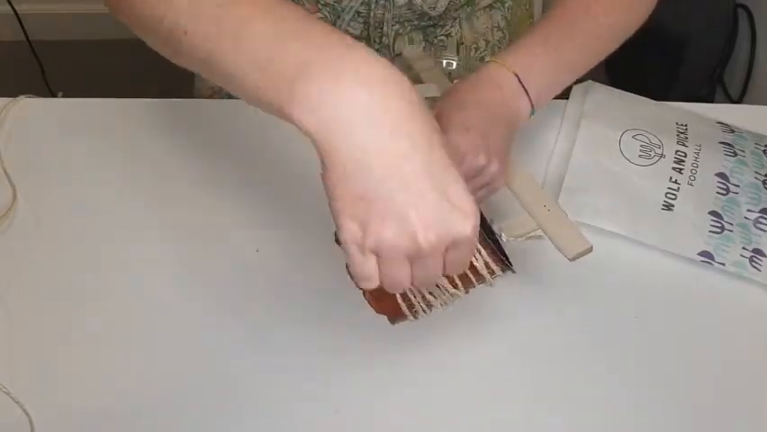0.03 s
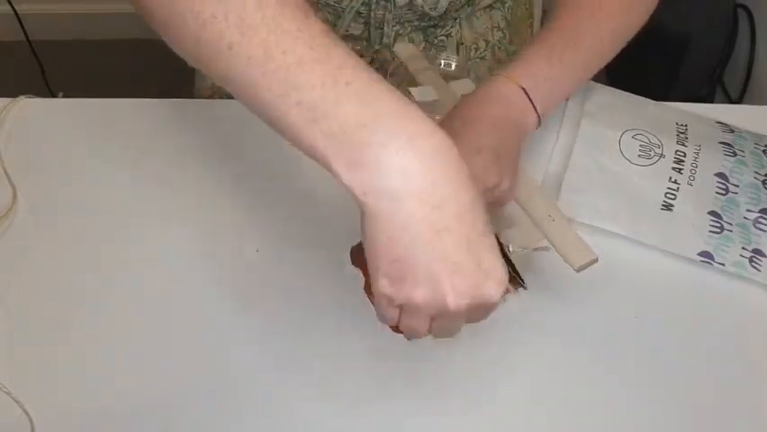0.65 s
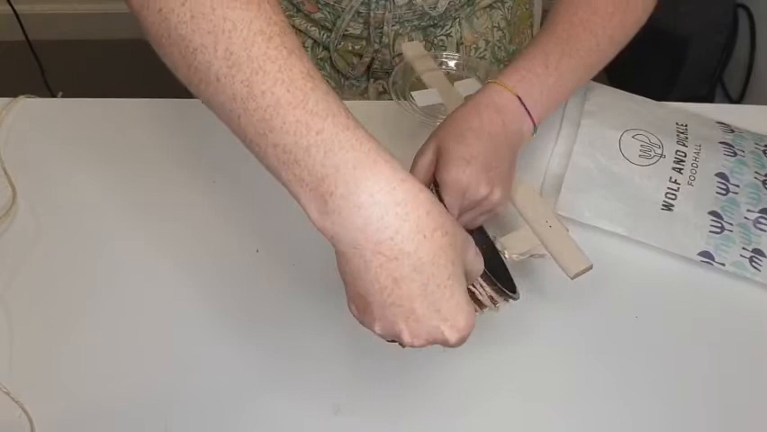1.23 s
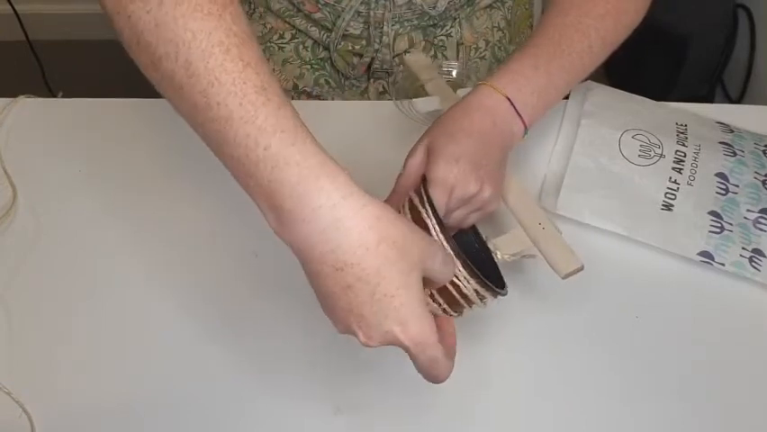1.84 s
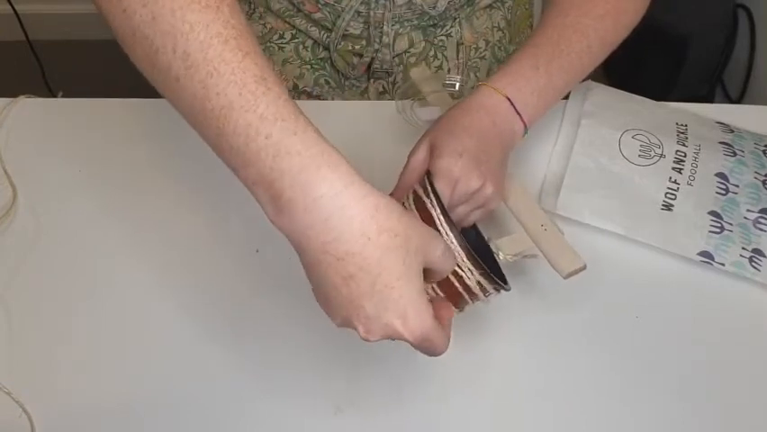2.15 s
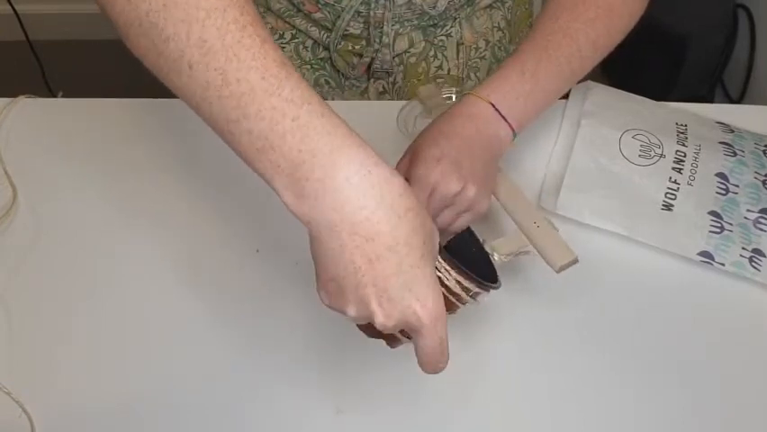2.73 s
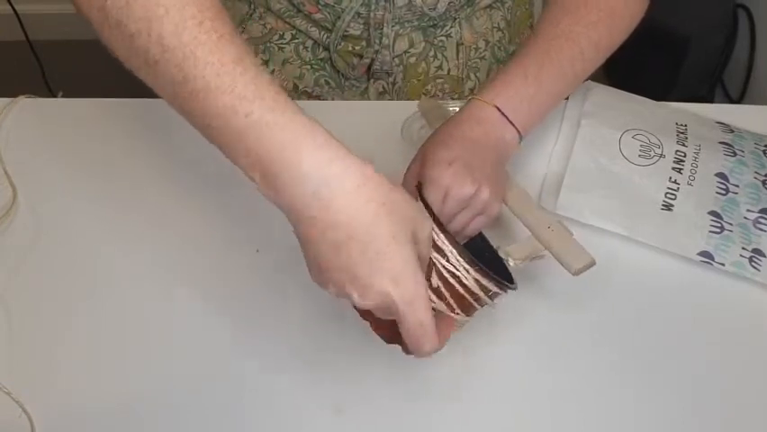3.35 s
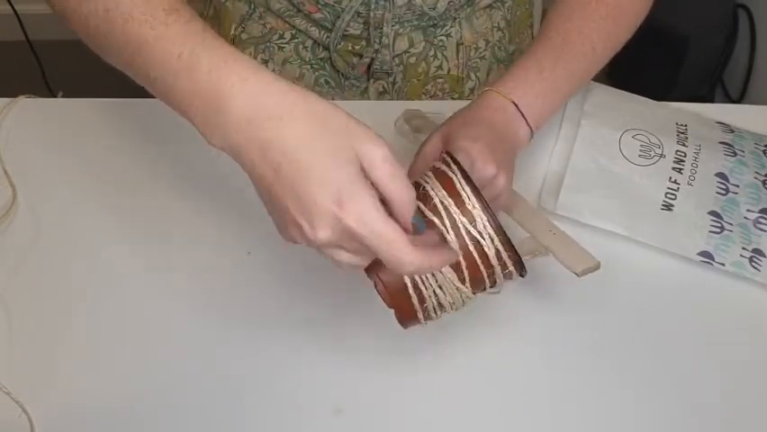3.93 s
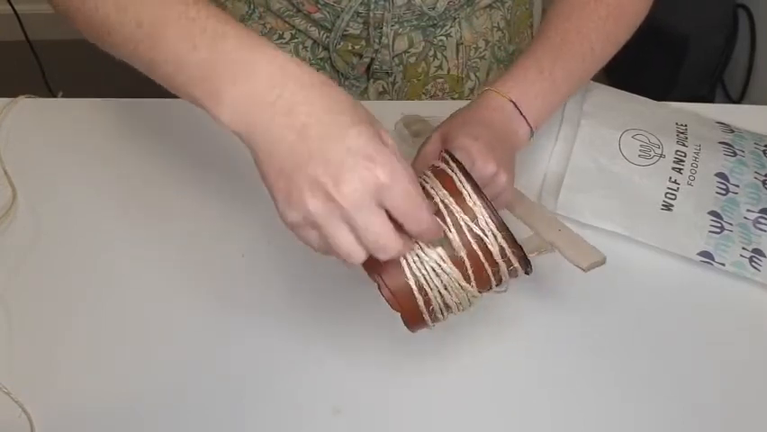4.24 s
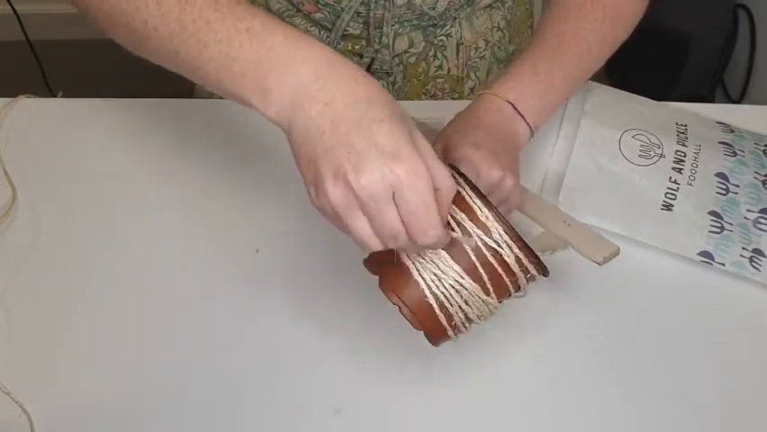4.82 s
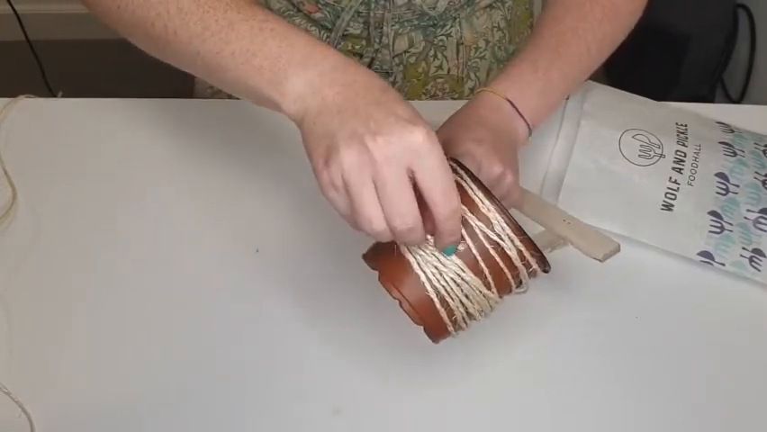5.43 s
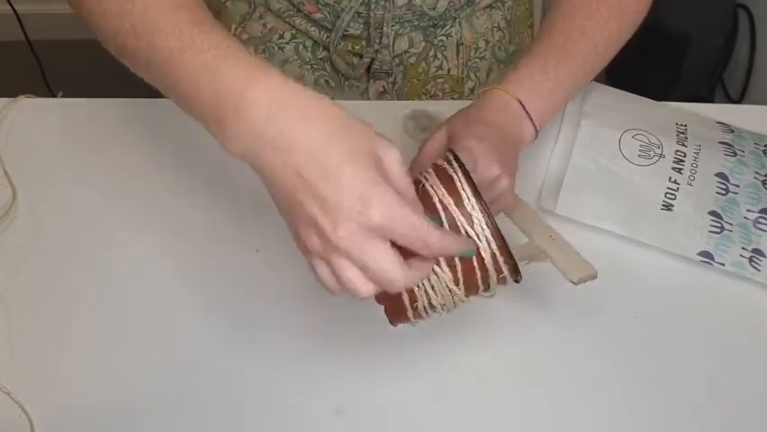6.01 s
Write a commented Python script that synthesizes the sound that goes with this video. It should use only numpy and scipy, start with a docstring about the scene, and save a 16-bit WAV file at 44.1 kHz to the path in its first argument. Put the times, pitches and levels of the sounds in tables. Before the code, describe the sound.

Fingers drag twine over a clay pot in uneven strokes, the fibres rustling and crackling while strands slip with small hollow snaps. The pot rocks on a table with light ringing taps, clacks down sharply once, then lands again with a duller thud. More rubbing, a cluster of clinks and a few fingernail rasps follow. It sounds close, in a small room with faint hiss and hum.

```python
"""Tucking twine around a clay pot

Fingers tuck twine around a clay flower pot that lies tilted on a table. Stroke by stroke the fibres
scrape and crackle, a nail rasps, and strands slip and snap against the wall. The pot rocks with small
ringing taps and twice knocks down harder. A small room echoes it all over a faint hiss and hum."""
import sys
import numpy as np
from scipy import signal
from scipy.fft import rfft, irfft, next_fast_len
from scipy.io import wavfile
from scipy.ndimage import map_coordinates

SR = 44100
rng = np.random.default_rng(int(sys.argv[2]) if len(sys.argv) > 2 else 0)


def wrap_up_sound(samples):
    """Save the sound to the file named by the first command line argument, as 16-bit audio."""
    columns = np.atleast_2d(samples).T
    # keep every value between -1 and 1, then stretch to whole-number steps
    tamed = np.clip(columns, -1, 1)
    steps = np.round(tamed * 32767).astype(np.int16)
    wavfile.write(sys.argv[1], SR, steps)


N = 272097

# The clay wall's tones (t60 is the time to fade by 60 dB): pitch_hz, t60_s, tapped_db, knocked_db
CLAY_TONES = [(492, .14, -12, -13), (1440, .08, -5, -15), (1545, .08, -5, -17), (2000, .12, -16, -11),
              (2300, .13, -7, -3), (2565, .085, -15, -4), (3105, .095, -9, -17), (3435, .06, -3, -12),
              (3551, .08, 6, -16), (4800, .1, -20, -13), (4880, .085, -6, -25), (6180, .08, -9, -20)]
# A colour says how strong each pitch is. The dull sound of twine on clay: pitch_hz, level_db
PLUCK_COLOUR = [(200, -32), (500, -31.5), (750, -19), (950, -2), (1170, 5.5), (1450, -6), (1900, -10.5),
                (3000, -24.5), (6000, -56)]
# The bright, dry sound of the fibres: pitch_hz, level_db
FIBRE_COLOUR = [(300, -27.5), (900, -10), (1400, -11.5), (2200, -3), (2850, 1.5), (3900, -2), (5400, -0.5),
                (7400, -2), (8700, -14.5), (11000, -14), (13000, -30)]
# The pot touching the table: pitch_hz, level_db
CONTACT_COLOUR = [(120, -20), (300, -17), (490, -9), (700, -6.5), (1000, 1), (1350, 1.5), (1900, -1.5),
                  (2600, -4.5), (4000, -4.5), (5800, -9), (7000, -16), (7900, -18), (9000, -26),
                  (13000, -43.5)]


def amp(db):
    """Turn decibels into a gain to multiply by."""
    return 10 ** (np.asarray(db) / 20)


def unit(x):
    """Scale a sound to an average (rms) level of 1."""
    return x / np.sqrt(np.mean(x ** 2) + 1e-20)


def along(points, hz):
    """Read between the rows of a (pitch_hz, value) table, on a log pitch scale."""
    pitches, values = np.transpose(points)
    return np.interp(np.log(hz + 1), np.log(pitches + 1), values)


def wobble(rate):
    """A curve that glides to a new random value `rate` times a second."""
    targets = rng.standard_normal(int(N * rate / SR) + 4)
    return map_coordinates(targets, [np.arange(N) * rate / SR], order=1)


def filtered(x, response):
    """Multiply each frequency in a sound by response(hz)."""
    n = x.shape[-1]
    padded = next_fast_len(n + min(n // 8, SR // 8), real=True)
    return irfft(rfft(x, padded) * response(np.fft.rfftfreq(padded, 1 / SR)), padded)[..., :n]


def coloured(x, colour, size=2048):
    """Give a sound a colour by turning each sample into a short click of that colour."""
    cepstrum = irfft(np.log(amp(along(colour, np.fft.rfftfreq(size, 1 / SR)))))
    cepstrum[1:size // 2] *= 2  # this folding packs the click's energy at its start
    cepstrum[size // 2 + 1:] = 0
    click = irfft(np.exp(rfft(cepstrum)))
    click /= np.linalg.norm(click)
    return signal.fftconvolve(x, click[None], axes=1)[:, :x.shape[1]]


def spread(pair):
    """Turn two unrelated noises into a left and right that are alike in the bass."""
    # How alike the two sides are: pitch_hz, likeness (0 to 1)
    alike = [(150, 0.98), (500, 0.4), (1000, 0.44), (2500, 0.6), (5000, 0.076), (10000, 0.062)]
    turn = lambda hz: np.arccos(np.clip(along(alike, hz), 0, 1)) / 2
    mid, side = filtered(pair, lambda hz: np.array([np.cos(turn(hz)), np.sin(turn(hz))]))
    return np.array([mid + side, mid - side])


def add(track, start_s, sound):
    """Mix a sound into a track at the given time."""
    part = track[:, max(round(start_s * SR), 0):][:, :sound.shape[-1]]
    part += sound[..., :part.shape[1]]


def blow(colour, contact_t60, scatter_db, scatter_t60):
    """A gritty hit, trailed by sound scattered off the hands, pot and table; it peaks near 1."""
    t = np.arange(SR // 7) / SR
    contact = rng.standard_normal(len(t)) * amp(-60 * t / contact_t60)
    contact /= np.linalg.norm(contact)
    scatter = spread(rng.standard_normal((2, len(t)))) * amp(-60 * t / scatter_t60)
    scatter /= np.linalg.norm(scatter[0])
    click = coloured(contact + amp(scatter_db) * scatter, colour)
    return click / (3 * np.std(click[:, :SR // 200]))


def ring(tones, vary_db, attack_s, beat_hz, twin_db):
    """Fading tones, at new strengths for each hit; each wavers against a weaker twin close in pitch."""
    t = np.arange(SR // 6) / SR
    hz, t60, db = np.transpose(tones)[:, :, None]
    level_db = db + vary_db * rng.standard_normal(hz.shape)
    phase = 2 * np.pi * (hz * t + rng.random(hz.shape))
    phase = phase + rng.standard_normal((2, len(hz), 1)) * hz / 4000  # highs reach the sides out of step
    drift = beat_hz * rng.standard_normal(hz.shape) * t + rng.random(hz.shape)
    waves = np.sin(phase) + amp(twin_db) * np.sin(phase + 2 * np.pi * drift)
    return np.sum(amp(level_db - 60 * t / t60) * waves, axis=1) * (1 - np.exp(-t / attack_s))


def friction(colour, catches_per_s, uneven_db, smooth_db, flutter_db):
    """Surfaces slide: many tiny catches of uneven size over a smooth noise."""
    catches = (rng.random(N) < catches_per_s / SR) * rng.choice([-1, 1], N)
    sizes = amp(uneven_db * np.minimum(rng.standard_normal(N), 2))
    sliding = spread(rng.standard_normal((2, N)))
    force = (unit(catches * sizes) + amp(smooth_db) * sliding) * amp(flutter_db * wobble(70))
    return unit(coloured(force, colour))


def background(hum_hz=62, hum_db=-73.5):
    """Steady hiss, hollow-toned on the left, and a low wavering hum."""
    # The colour of the hiss on each side: pitch_hz, level_db
    left_colour = [(25, -17.5), (60, -8), (110, -10), (250, -20), (600, -30.5), (1100, -5.5), (1550, 4),
                   (2100, -13), (2600, -32), (3100, -5), (3500, -9.5), (3900, -43), (4800, -12),
                   (5400, -28.5), (12000, -31)]
    right_colour = [(25, -4), (60, 8), (110, 1.5), (250, -6), (800, -15.5), (1400, -13), (2000, -22),
                    (3800, -26), (5000, -10), (7300, -21), (8500, -15), (12000, -20)]
    left = amp(-53.5) * unit(coloured(rng.standard_normal((1, N)), left_colour))
    right = amp(-70) * unit(coloured(rng.standard_normal((1, N)), right_colour))
    hum_gain = amp(hum_db + 3 * wobble(8))
    hum = hum_gain * np.sin(2 * np.pi * hum_hz * np.arange(N) / SR + .65 * wobble(9))
    return np.vstack([left, right]) + hum


def room_echo(x):
    """The small room answers 4 ms later, and each pitch dies away at its own speed."""
    # How long the echo lasts: pitch_hz, t60_s
    fade_times = [(150, 0.28), (600, 0.26), (3000, 0.19), (7000, 0.12), (12000, 0.28)]
    hz, t, noise = signal.stft(spread(rng.standard_normal((2, SR // 2))), SR, nperseg=256)
    fade = amp(-60 * t / along(fade_times, hz)[:, None])
    tail = signal.istft(noise * fade, SR, nperseg=256)[1]
    tail = np.pad(tail, ((0, 0), (SR // 250, 0))) / np.linalg.norm(tail[0])
    return signal.fftconvolve(x, tail, axes=1)[:, :N]


def microphones(x, left_lag_samples=2.95):
    """The left side hears more middle pitches and hears later; the right hears more treble."""
    # The balance of the two sides: pitch_hz, left_minus_right_db
    balance = [(150, 1), (300, 1.5), (600, 6.5), (1200, 2.5), (1700, 4), (2300, 4), (3200, 12), (4000, 2),
               (4800, -1.5), (5800, -15), (7400, -25.5), (9000, -5.5), (12000, -11)]

    def response(hz):
        sides = amp(np.outer([.5, -.5], along(balance, hz)))
        delay = np.exp(-2j * np.pi * np.outer([left_lag_samples, 0], hz) / SR)
        return sides * delay / np.sqrt(np.mean(sides ** 2, axis=0))
    return filtered(x, response)


def pot_air(x):
    """The air in the pot rings along with everything that touches it."""
    # The pitches this air boosts: pitch_hz, width_hz, level_db
    air_tones = [(620, 7.7, -2), (950, 29, -8), (1049, 26, -6.5), (1184, 30, -11), (1314, 21, -2),
                 (1389, 40, 1.5), (2630, 93, -5.5), (3150, 123, -3)]
    return filtered(x, lambda f: 1 + sum(amp(db) * 1j * f * width / (hz * hz - f * f + 1j * f * width)
                                         for hz, width, db in air_tones))


def pot_shifts():
    """The pot's foot judders briefly over the table: the top booms and the clay grinds."""
    # Each small slide: start_s, length_s, boom_db, grind_db
    shifts = [(0.885, 0.059, -91, -65), (3.01, 0.077, -60, -62), (3.424, 0.076, -81, -58.5),
              (3.538, 0.044, -69.5, -53.5), (4.959, 0.084, -61.5, -59.5), (5.09, 0.085, -62, -59.5),
              (6.02, .14, -74, -71)]
    # The booming table and the grinding clay: pitch_hz, level_db
    boom_colour = [(40, -12), (110, -13.5), (155, 3), (210, -35), (500, -9), (1500, -59)]
    grind_colour = [(100, -38), (280, -12), (400, -0.5), (620, -1), (800, 4), (1200, -17), (3000, -73)]
    t = np.arange(N) / SR
    boom = friction(boom_colour, catches_per_s=240, uneven_db=8, smooth_db=5, flutter_db=1.5)
    grind = friction(grind_colour, catches_per_s=310, uneven_db=6, smooth_db=-9, flutter_db=-1)
    out = np.zeros((2, N))
    for start_s, length_s, boom_db, grind_db in shifts:
        push = np.interp(t - start_s, [0, 0.004, length_s / 2, length_s], [0.022, 0.97, 0.93, 0.019])
        out += push * (amp(boom_db) * boom + amp(grind_db) * grind)
    return out


def pot_taps():
    """The pot rocks on its rim: a short contact, then the clay's ring swells and fades."""
    # Each touch on the table: start_s, level_db
    taps = [(0.522, -38), (0.63, -39), (1.021, -37.5), (1.39, -34), (1.497, -32.5), (1.641, -30.5),
            (1.86, -30.5), (1.97, -31.5), (2.077, -32), (2.549, -37), (2.721, -37.5), (2.846, -27.5),
            (2.957, -38), (3.527, -32), (3.639, -36), (3.954, -38.5), (4.068, -46), (4.694, -37),
            (4.802, -25), (4.845, -34), (4.913, -33), (4.966, -36.5), (5.023, -30), (5.13, -32),
            (5.213, -40), (5.311, -37), (5.412, -44.5), (6.062, -39)]
    palm_lifts_s, clink_hz = 4.5, 3551  # until it lifts, a palm on the wall mutes the clearest tone
    out = np.zeros((2, N))
    for start_s, level_db in taps:
        muted_db = 5 * (start_s < palm_lifts_s)
        tones = [(hz, t60, db - muted_db * (hz == clink_hz)) for hz, t60, db, _ in CLAY_TONES]
        contact = blow(CONTACT_COLOUR, contact_t60=0.0088, scatter_db=0.5, scatter_t60=0.078)
        clay = ring(tones, vary_db=2, attack_s=.005, beat_hz=55, twin_db=-9)
        add(out, start_s, amp(level_db) * contact)
        add(out, start_s, amp(level_db - 9) * clay)
    return out


def pot_knocks():
    """Harder blows clack, ring the clay and shake the table top."""
    # Each hard landing: start_s, clack_db, contact_db, clay_db, thud_db
    knocks = [(1.567, -9.5, -19, -37, -74), (2.7764, -32, -20.5, -27, -33.5)]
    # The sharp clack: pitch_hz, level_db
    clack_colour = [(200, -50), (350, -38), (480, -4), (540, -20), (620, 0), (770, -19), (980, 3.5),
                    (1180, 7.5), (1400, -4), (1750, -15), (2350, -3), (2900, 1), (3250, -7), (4400, -11),
                    (5400, -12), (7600, -15), (9000, -21), (13000, -35)]
    # The table top's low tones: pitch_hz, t60_s, level_db
    table_tones = [(69, .15, -13), (157, .16, 4), (240, .08, -7), (365, .12, -6)]
    tones = [(hz, t60, knocked_db) for hz, t60, _, knocked_db in CLAY_TONES]
    out = np.zeros((2, N))
    for start_s, *levels_db in knocks:
        clack = blow(clack_colour, contact_t60=0.014, scatter_db=-2, scatter_t60=0.08)
        contact = blow(CONTACT_COLOUR, contact_t60=0.0073, scatter_db=1.5, scatter_t60=0.26)
        clay = ring(tones, vary_db=1, attack_s=.002, beat_hz=50, twin_db=-14)
        thud = ring(table_tones, vary_db=.5, attack_s=.011, beat_hz=8, twin_db=-20)
        for level_db, sound in zip(levels_db, [clack, contact, clay, thud]):
            add(out, start_s, amp(level_db) * sound)
    return out


def nail_scratches():
    """A nail rakes the twine: a narrow rasp that swells and stops."""
    # Each scratch: start_s, length_s, level_db
    scratches = [(3.37, .06, -62), (4.261, 0.067, -54.5), (5.06, .06, -53), (5.477, 0.16, -54.5),
                 (5.657, 0.056, -51.5), (5.748, 0.072, -43), (5.817, 0.11, -50)]
    # The nail's rasp: pitch_hz, level_db
    nail_colour = [(1500, -28), (2350, -12), (2700, 6.5), (3150, 0), (3700, 1), (6000, -41)]
    rasp = friction(nail_colour, catches_per_s=400, uneven_db=5, smooth_db=0, flutter_db=2.5)
    press = np.zeros((1, N))
    for start_s, length_s, level_db in scratches:
        add(press, start_s, amp(level_db) * np.sin(np.linspace(0, np.pi, round(length_s * SR))))
    return press * rasp


def finger_effort():
    """Gains for the dull rub, the fibres and their treble: strokes swell and fade over a light grip."""
    # The hands keep creeping over the twine between strokes: time_s, rustle_db
    grip = [(0, -58), (.5, -59), (.76, -75), (1.0, -57.5), (1.9, -59.5), (2.3, -59), (3.2, -61.5),
            (3.9, -56.5), (4.06, -80), (4.3, -61), (4.9, -59), (5.35, -63.5), (6.17, -72)]
    # Fingers drag the twine: start_s, rise_s, fade_s (to fall 20 dB), rub_db, fibre_db, treble_tilt_db
    strokes = [(0.01, 0.063, 0.087, -44, -49, 2), (0.079, 0.053, 0.04, -49, -41, -6.5),
               (0.27, 0.023, 0.46, -50.5, -55, -3), (0.615, 0.058, 0.068, -53, -53.5, -2),
               (0.794, 0.053, 0.055, -47.5, -55, 0), (0.835, 0.022, 0.14, -52, -45, -6),
               (1.07, 0.058, 0.22, -45, -52.5, -2), (1.74, 0.029, .2, -48, -61, -13),
               (2.116, 0.028, 0.074, -40.5, -42.5, -1), (2.268, 0.024, 0.13, -45, -43, -2),
               (2.35, 0.047, 0.053, -48.5, -46, 2.5), (2.58, 0.048, 0.12, -55.5, -51, 1),
               (2.71, 0.049, 0.12, -48, -49, -13), (2.83, 0.068, 0.17, -49, -48, -5.5),
               (3.01, 0.036, 0.18, -53, -55, 8), (3.235, 0.032, 0.54, -52, -50, 0.5),
               (3.31, 0.079, 0.19, -47.5, -45, -5.5), (3.43, 0.059, 0.049, -35.5, -35.5, 3.5),
               (3.665, 0.042, 0.044, -51, -59, -4), (3.744, 0.027, 0.22, -51.5, -49, -2.5),
               (3.86, 0.051, 0.033, -48, -63, -10), (4.245, 0.037, .16, -77, -49.5, -4),
               (4.39, .06, 0.28, -55, -54, -8), (5.045, 0.043, 0.065, -66, -54.5, -15.5),
               (5.375, 0.13, 0.28, -44.5, -50.5, -3), (5.53, 0.057, 0.2, -60, -49.5, -7.5),
               (5.646, 0.044, 0.11, -48, -47, -1.5), (5.731, 0.049, 0.056, -48.5, -41.5, -1),
               (5.815, 0.036, 0.25, -51.5, -48, 0.5), (5.974, 0.041, 0.17, -48.5, -46.5, -3),
               (6.12, 0.036, .12, -56, -47, -6.5)]
    t = np.arange(N) / SR
    grip_db = np.interp(t, *np.transpose(grip))
    power = amp([grip_db - 1.5, grip_db + 1.5, grip_db - 1.5]) ** 2  # rub, fibres, treble
    age_s = t[:SR]
    for start_s, rise_s, fade_s, rub_db, fibre_db, tilt_db in strokes:
        swell = np.minimum(age_s / rise_s, 1) * amp(-20 * np.maximum(age_s - rise_s, 0) / fade_s)
        gains = amp([rub_db, fibre_db - tilt_db / 2, fibre_db + tilt_db / 2])
        add(power, start_s, np.outer(gains, swell) ** 2)
    return np.sqrt(power)


def twine_slips(rub_gain, fibre_gain, small_slips_per_s=8):
    """A strand lets go: a hollow pluck and a dry crack. Small slips by chance follow the rubbing level."""
    # The clear slips over the clay: start_s, pluck_db, crack_db
    slips = [(0.044, -39, -39), (0.122, -34, -40), (0.141, -30.5, -40), (0.174, -35.5, -58),
             (0.304, -20.5, -40), (0.318, -26.5, -48), (0.338, -44, -53), (0.351, -38, -55),
             (0.832, -27.5, -54), (0.844, -34, -29.5), (0.882, -32.5, -48), (1.312, -26.5, -28.5),
             (1.781, -37.5, -43), (2.138, -33.5, -25.5), (2.292, -33.5, -38), (2.337, -32.5, -42),
             (2.721, -29, -63), (2.875, -41, -30), (2.956, -35.5, -59), (3.006, -34, -50),
             (3.267, -55, -36), (3.479, -33, -45), (3.91, -39, -42), (4.159, -48, -44), (4.624, -34.5, -46),
             (4.786, -32, -40), (4.791, -31, -36.5), (5.466, -45, -43), (5.760, -40.5, -31),
             (6.134, -39.5, -34)]
    events = [(start_s, amp(pluck_db), amp(crack_db)) for start_s, pluck_db, crack_db in slips]
    for i in np.flatnonzero(rng.random(N) < small_slips_per_s / SR):
        pluck_boost, crack_boost = amp(rng.normal([6, 8.5], 5))  # peaks above the rubbing
        events.append((i / SR, pluck_boost * rub_gain[i], crack_boost * fibre_gain[i]))
    out = np.zeros((2, N))
    for start_s, pluck_gain, crack_gain in events:
        pluck = blow(PLUCK_COLOUR, contact_t60=0.0021, scatter_db=-2, scatter_t60=0.029)
        crack = blow(FIBRE_COLOUR, contact_t60=0.0087, scatter_db=0, scatter_t60=0.094)
        add(out, start_s, pluck_gain * pluck + crack_gain * crack)
    return out


def twine_rubbing(rub_gain, fibre_gain, treble_gain, treble_hz=4500):
    """Twine dragged over clay: a dull rub, and the rustle of its fibres."""
    rub = amp(-3) * friction(PLUCK_COLOUR, catches_per_s=260, uneven_db=8, smooth_db=4, flutter_db=3.5)
    fibres = friction(FIBRE_COLOUR, catches_per_s=700, uneven_db=6, smooth_db=4, flutter_db=3)
    treble = filtered(fibres, lambda hz: hz ** 6 / (hz ** 6 + treble_hz ** 6))
    return rub_gain * rub + fibre_gain * (fibres - treble) + treble_gain * treble


def scene():
    """The pot and twine in their room, over the steady background."""
    rub_gain, fibre_gain, treble_gain = finger_effort()
    pot = pot_taps() + pot_knocks() + pot_shifts()
    rubbing = twine_rubbing(rub_gain, fibre_gain, treble_gain)
    twine = rubbing + twine_slips(rub_gain, fibre_gain) + nail_scratches()
    near = pot_air(pot + twine)
    return microphones(near + amp(-7) * room_echo(near)) + background()


def record(dry):
    """Soften the deepest bass and cut off the highest treble."""
    low_hz, top_hz = 40, 12800
    bass_cut = lambda hz: hz ** 3 / np.sqrt(hz ** 6 + low_hz ** 6)
    return filtered(dry, lambda hz: bass_cut(hz) / np.sqrt(1 + (hz / top_hz) ** 90))


dry = scene()
out = record(dry)
wrap_up_sound(out)
```